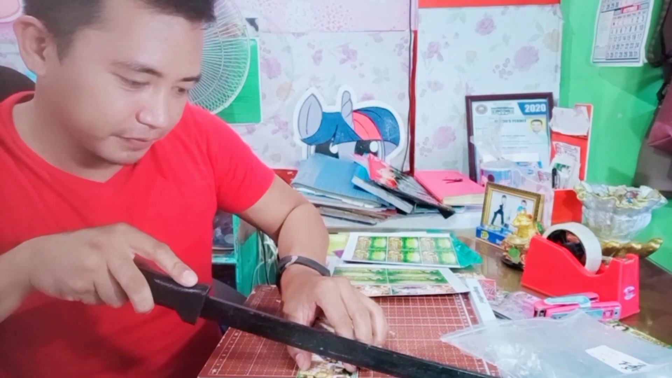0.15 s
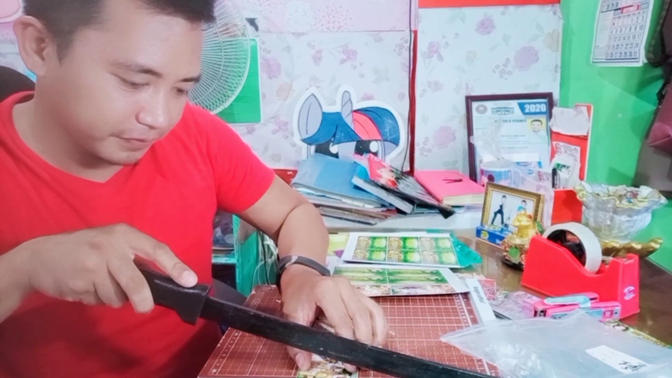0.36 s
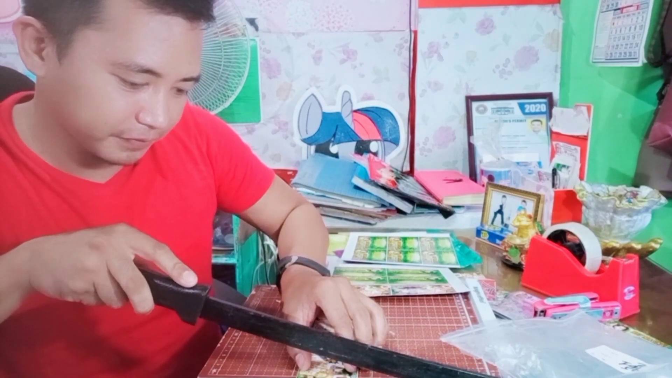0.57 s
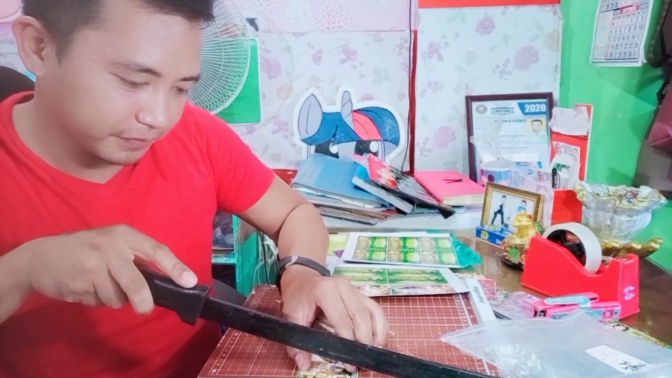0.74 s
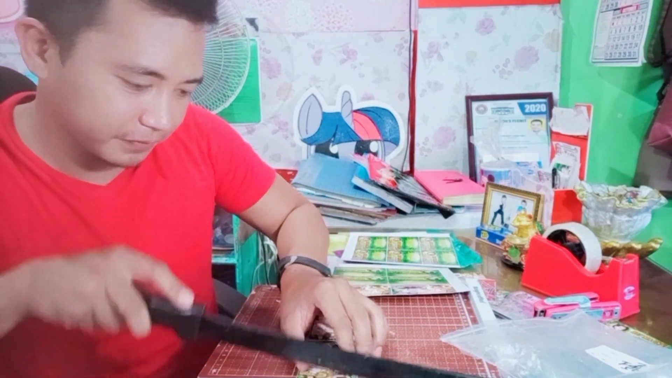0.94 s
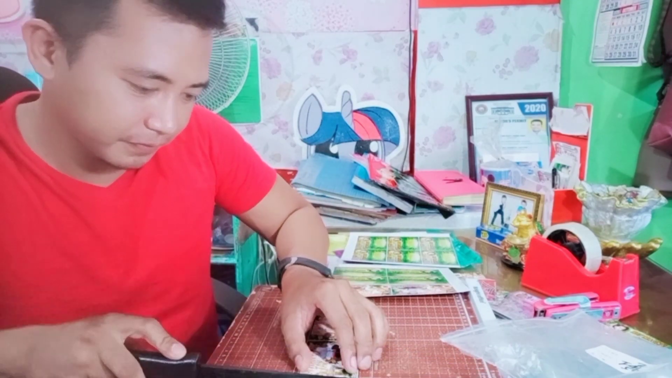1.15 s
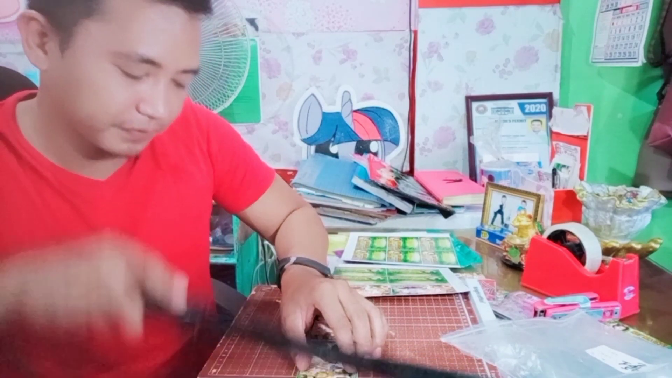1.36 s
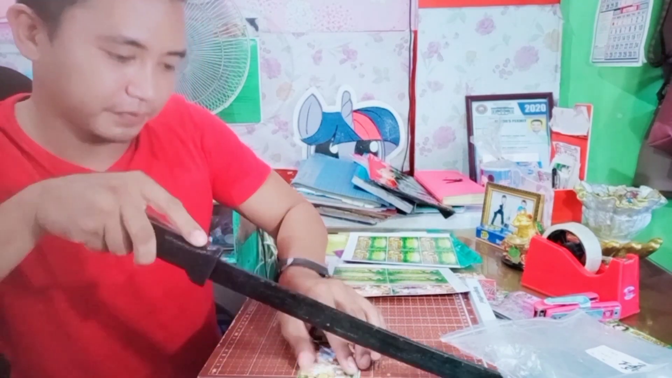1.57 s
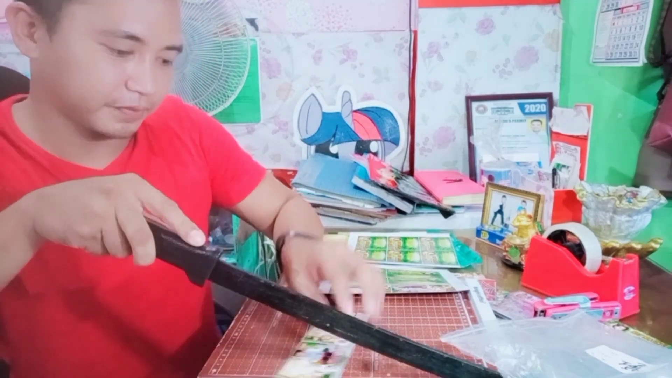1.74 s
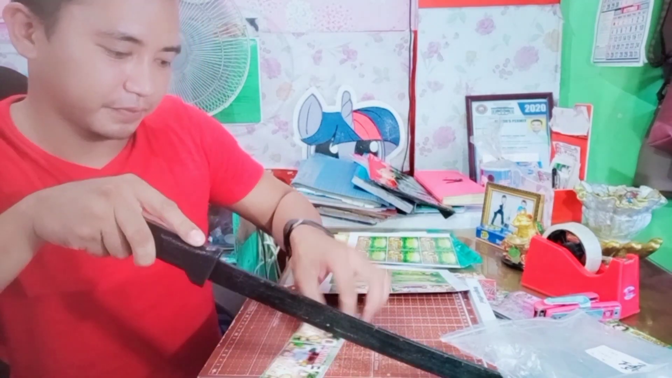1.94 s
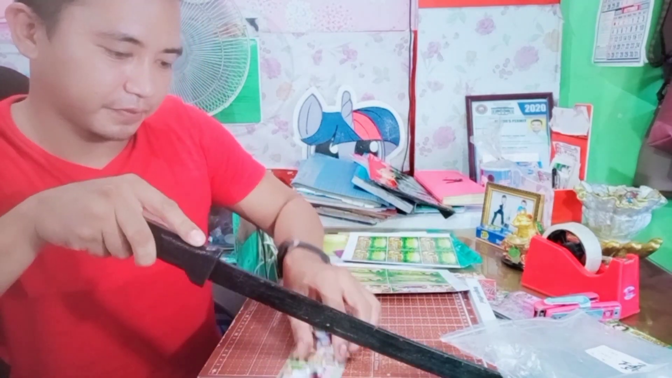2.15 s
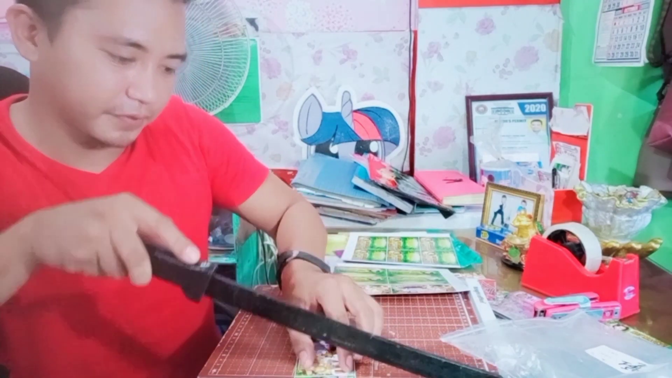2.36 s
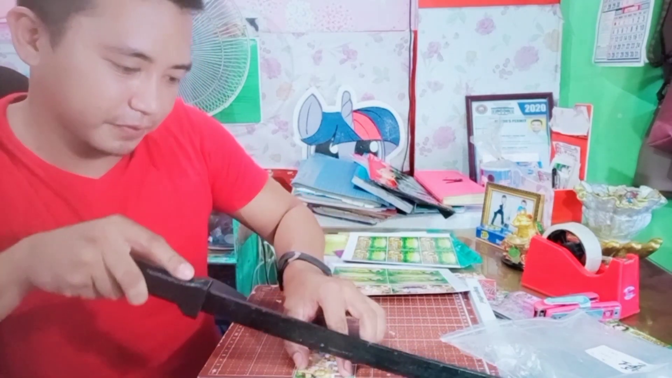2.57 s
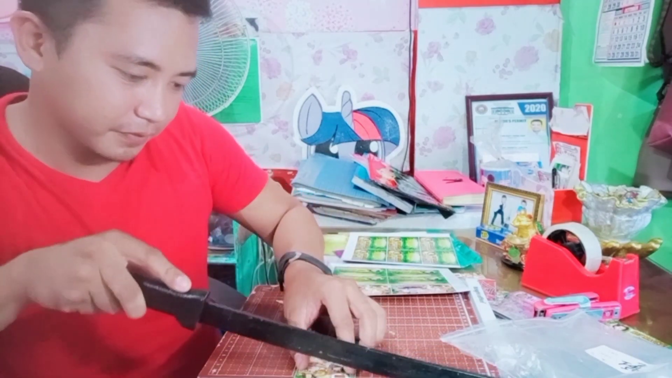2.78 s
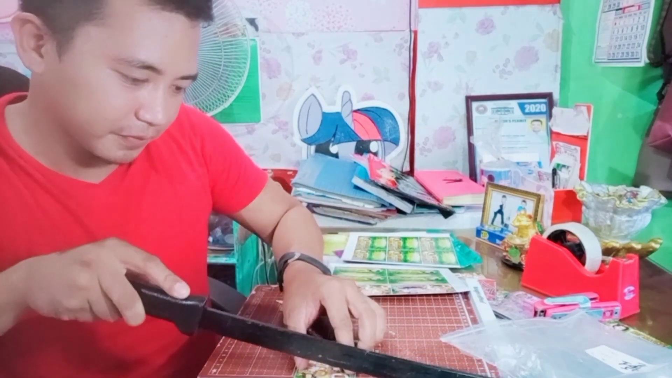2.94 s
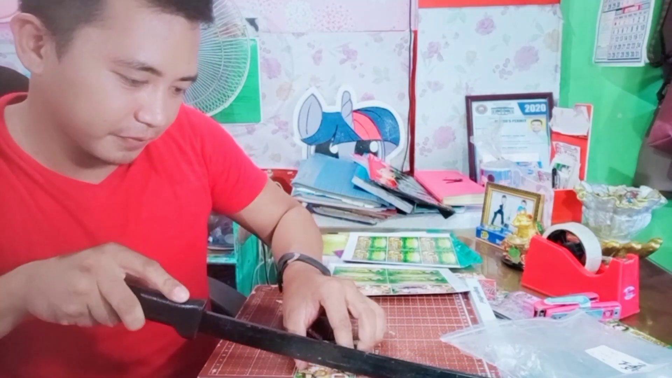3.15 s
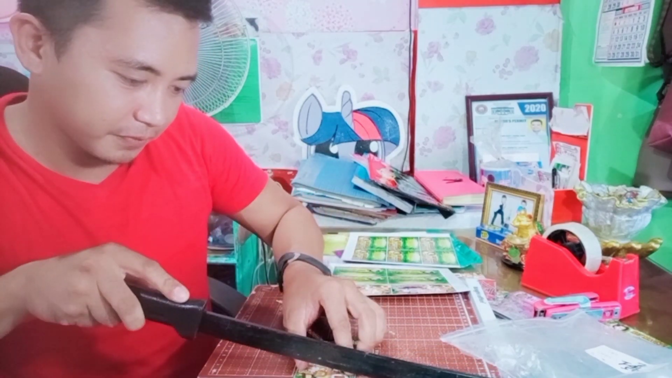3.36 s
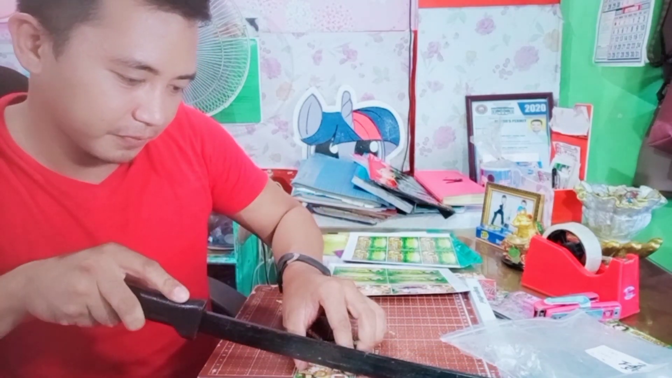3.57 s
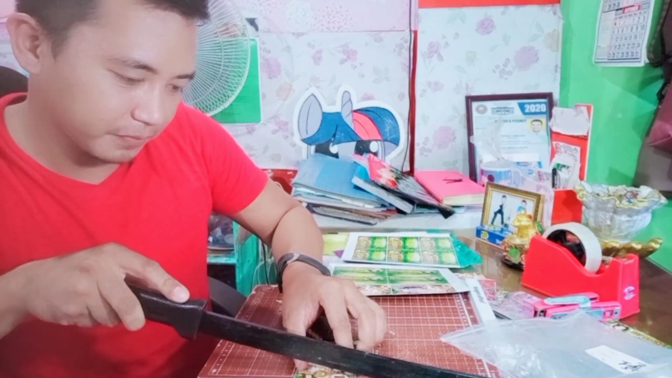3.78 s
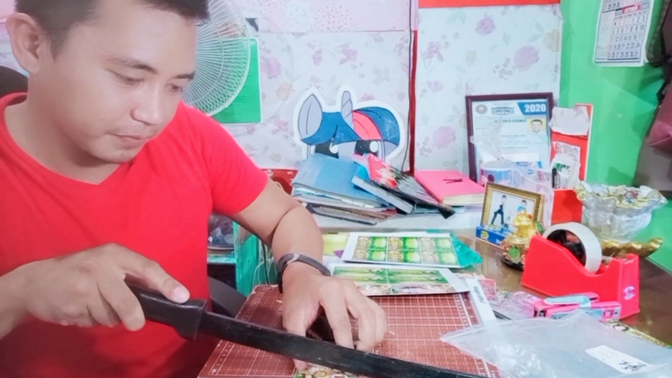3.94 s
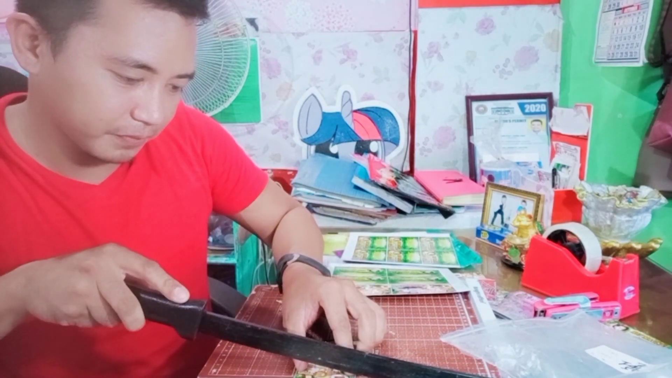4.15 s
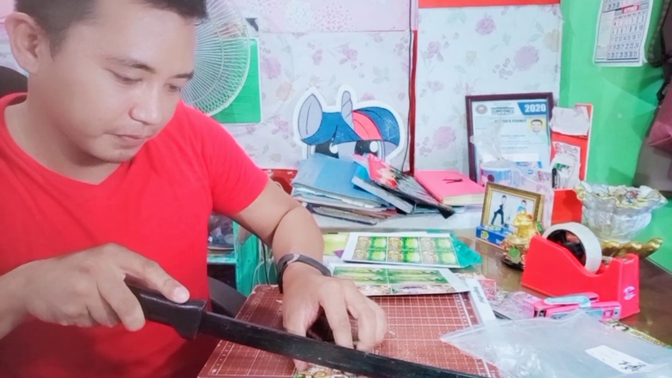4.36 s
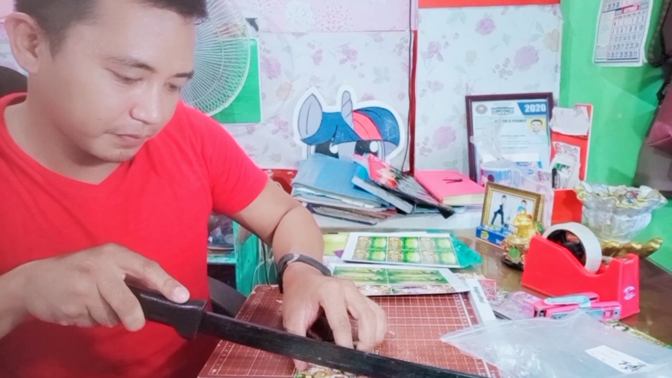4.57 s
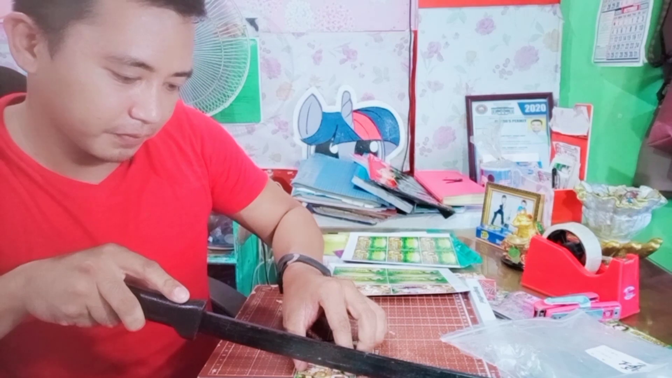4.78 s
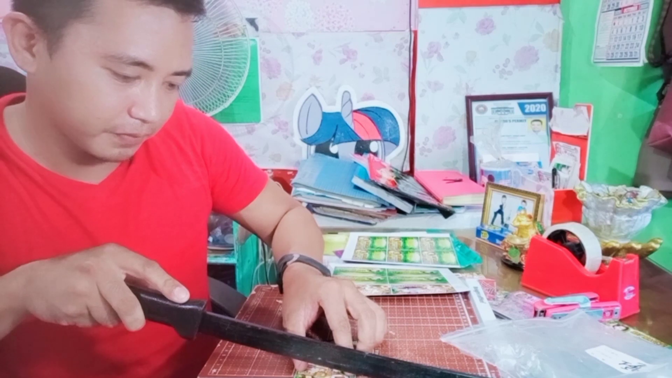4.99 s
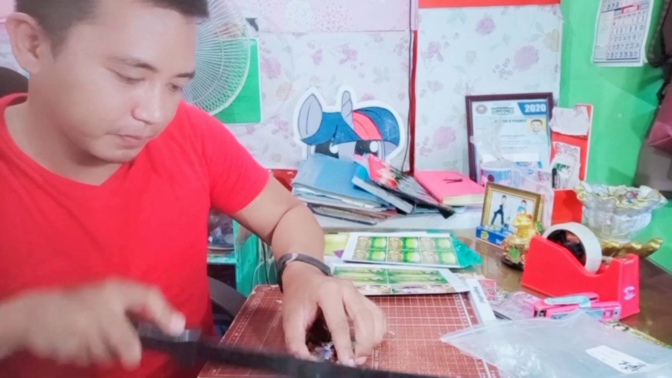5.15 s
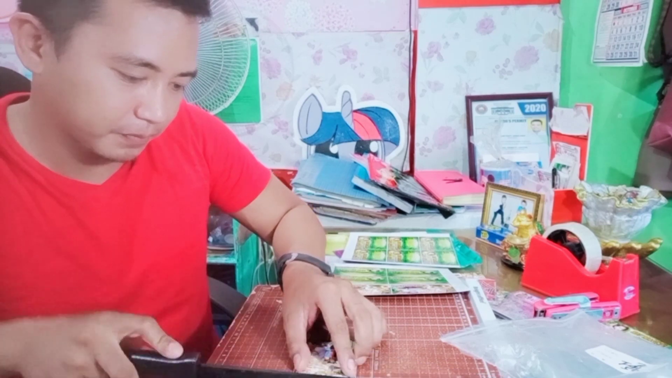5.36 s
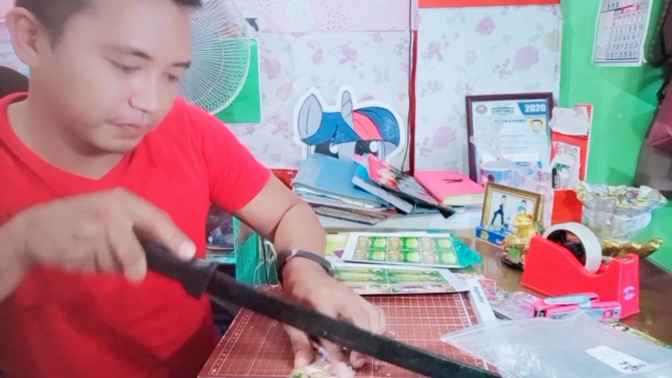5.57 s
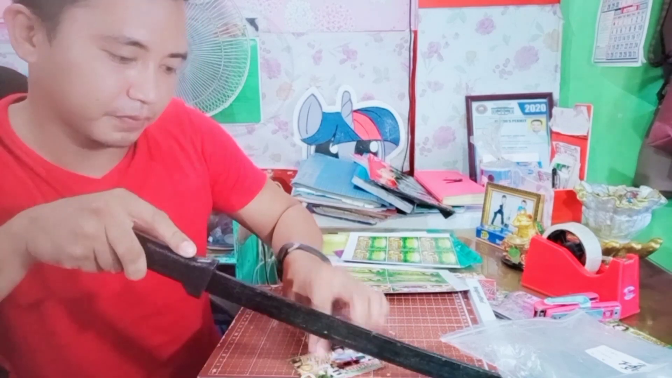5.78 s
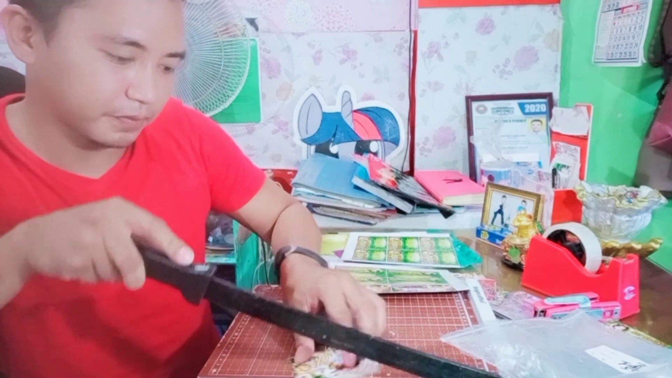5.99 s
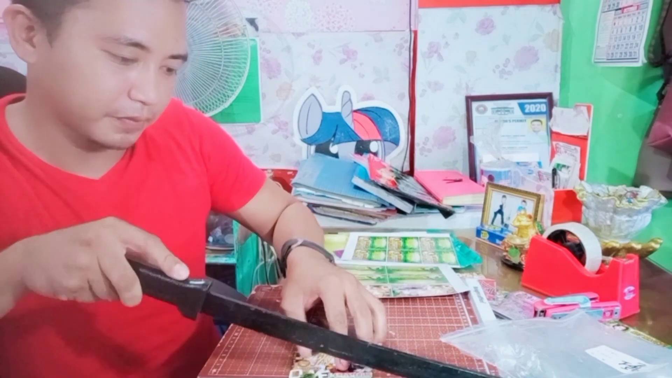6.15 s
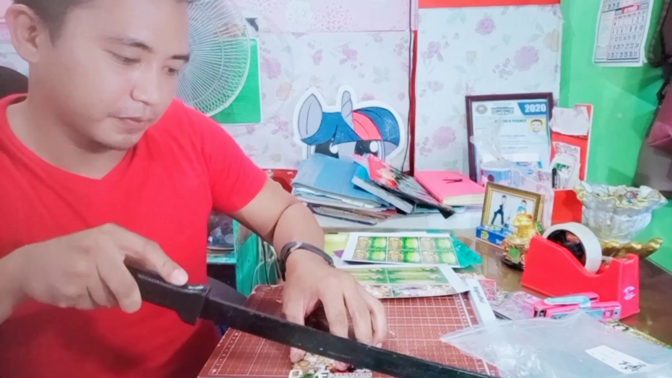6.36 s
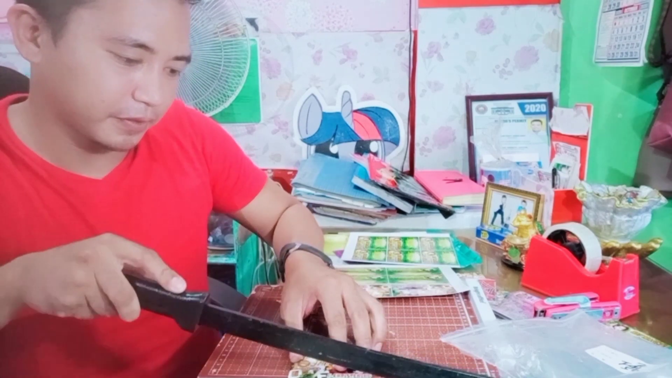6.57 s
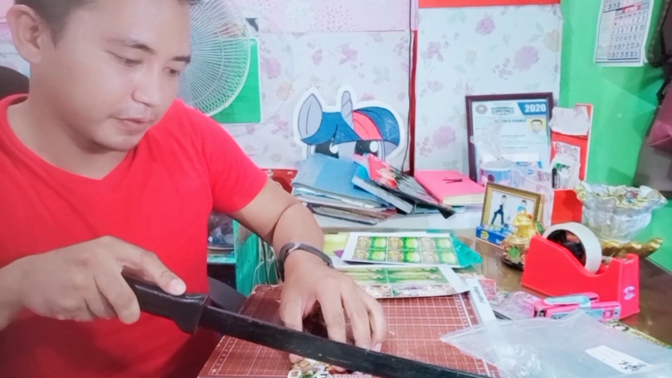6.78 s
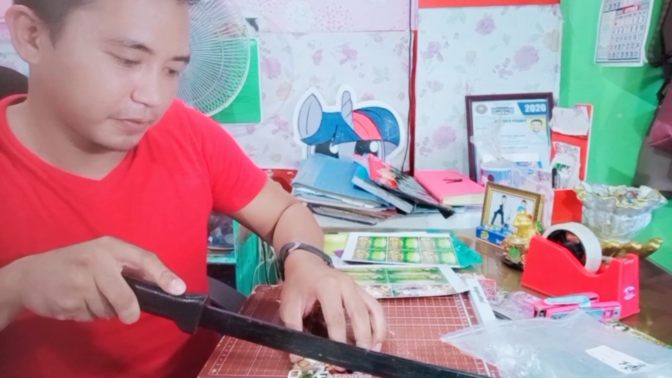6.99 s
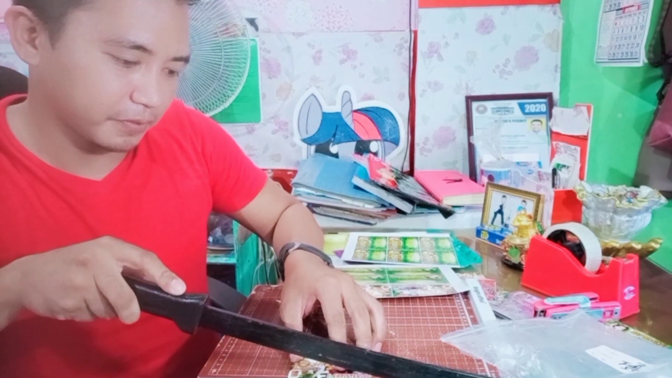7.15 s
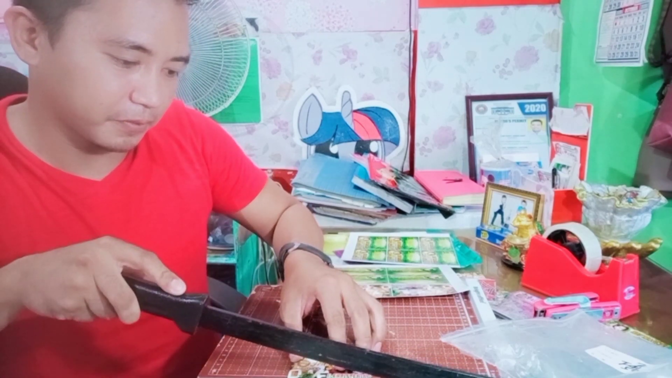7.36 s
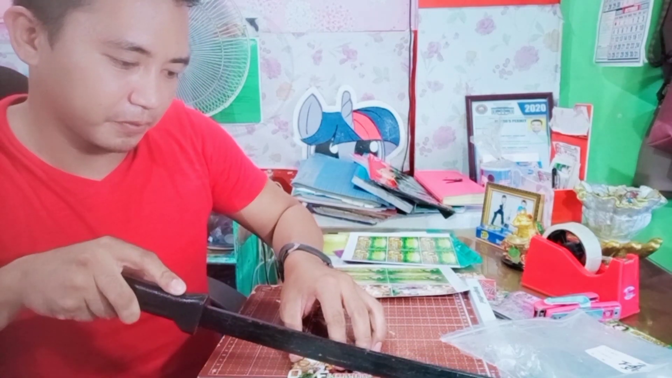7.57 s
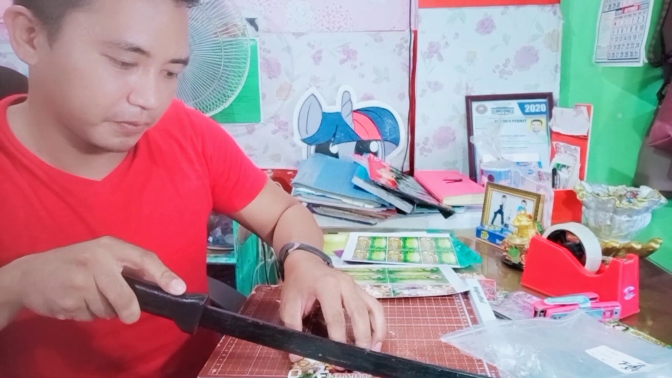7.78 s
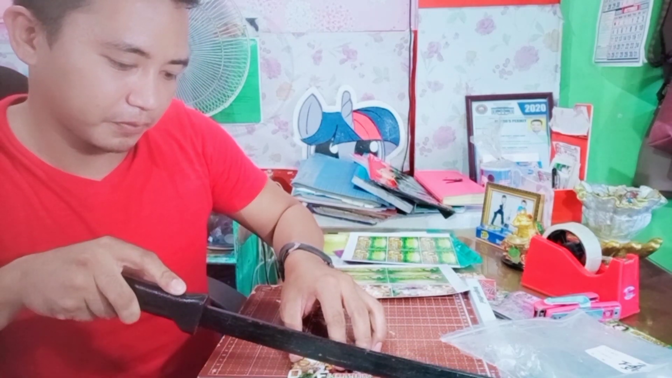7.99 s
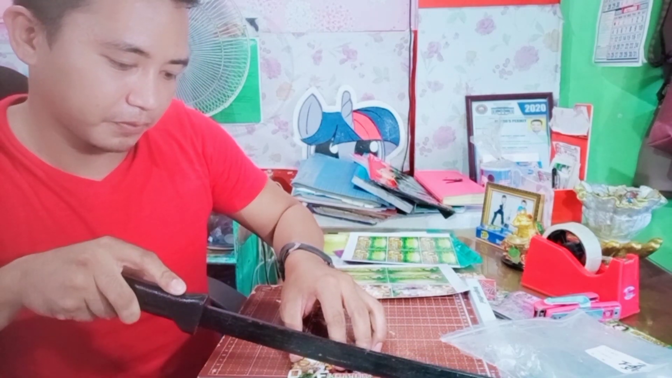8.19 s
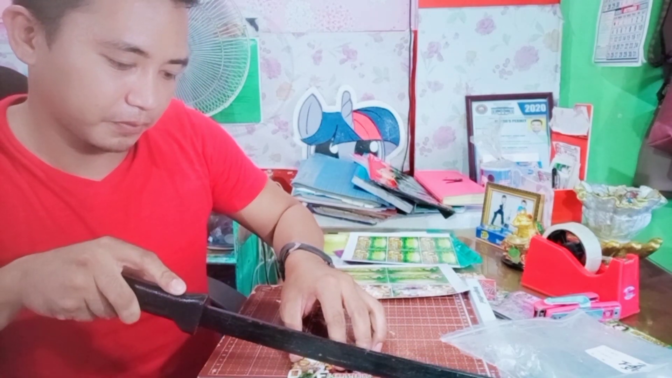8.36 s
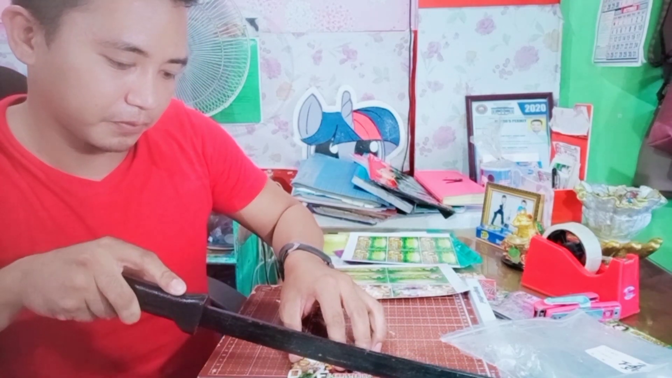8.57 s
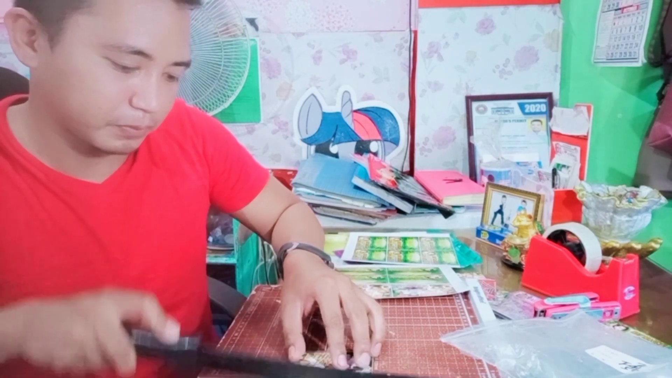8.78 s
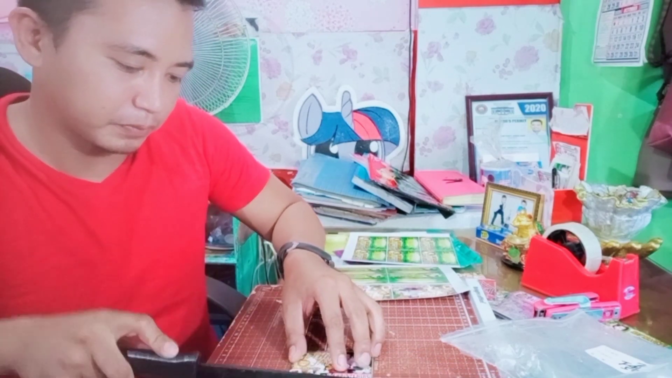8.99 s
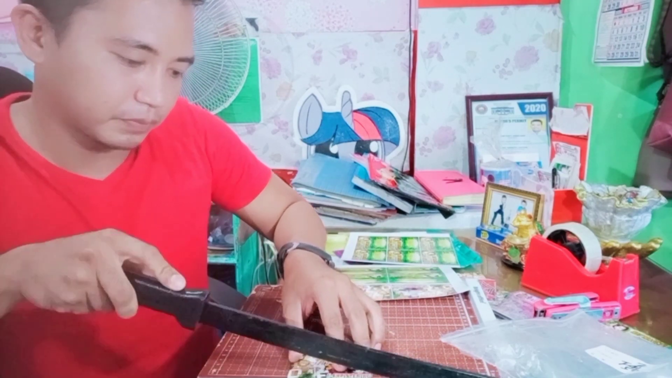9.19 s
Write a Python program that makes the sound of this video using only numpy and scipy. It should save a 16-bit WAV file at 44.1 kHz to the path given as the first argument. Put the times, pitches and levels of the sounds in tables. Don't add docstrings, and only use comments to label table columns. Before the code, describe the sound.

Steel cutter blade slices and thuds on its board in a small room, over a low engine drone that grows loud midway, then recedes.

```python
import sys
import numpy as np
from scipy import signal
from scipy.fft import rfft, irfft, next_fast_len
from scipy.io import wavfile
from scipy.ndimage import uniform_filter1d

SR = 44100
rng = np.random.default_rng(int(sys.argv[2]) if len(sys.argv) > 2 else 0)


def to_wav(s):
    ch = np.atleast_2d(s).T
    pcm = np.round(np.clip(ch, -1, 1) * 32767)
    wavfile.write(sys.argv[1], SR, pcm.astype(np.int16))


N = 407043
STREET_LAG = 19


def undb(db):
    return 10 ** (np.asarray(db) / 20)


def unit(x):
    return x / np.sqrt(np.mean(x ** 2))


def peak_unit(y):
    return y / np.abs(y.mean(axis=0)).max()


def columns(rows, step=1):
    s, *cols = np.transpose(rows)
    t = np.arange(0, N, step) / SR
    return np.array([np.interp(t, s, c) for c in cols])


def on_log(hz, points):
    f, v = np.transpose(points)
    return np.interp(np.log(hz + 1), np.log(f), v)


def walk(rate, count=1, step=1):
    held = np.repeat(rng.standard_normal((count, int(N / SR * rate) + 2)), 16, axis=1)
    slewed = 1.3 * uniform_filter1d(uniform_filter1d(held, 16), 16)
    place = np.arange(0, N, step) / SR * rate * 16
    return np.array([np.interp(place, np.arange(len(w)), w) for w in slewed])


def add(out, s, y):
    i = int(s * SR)
    out[:, i:i + y.shape[1]] += y[:, :N - i]


def shape(x, points, tilt_db=0):
    hz = np.arange(x.shape[1] // 2 + 1) * SR / x.shape[1]
    colour_db = on_log(hz, points) + tilt_db * np.log2(hz / 2000 + .1)
    return irfft(rfft(x) * undb(colour_db), x.shape[1])


# frequency in Hz, share common to both [0-1].
LIKENESS = [(60, 0.8), (330, 0.96), (600, 0.94), (900, 0.21), (2500, 0.55), (4000, 0.021), (15000, 0.04)]


def hiss(colour, split_hz, lag, grain=1.):
    size = next_fast_len(N)
    hz = np.arange(size // 2 + 1) * SR / size
    own = rfft(grain * rng.standard_normal((3, N)), size)
    like = np.clip(on_log(hz, LIKENESS), 0, 1)
    late = np.array([np.exp(-2j * np.pi * hz * lag / SR), np.ones_like(hz)])
    pair = np.sqrt(like) * own[2] * late + np.sqrt(1 - like) * own[:2]
    pair = pair * undb(on_log(hz, colour))
    below = [0 * hz] + [1 / (1 + (hz / f) ** 12) for f in split_hz] + [0 * hz + 1]
    bands = [np.sqrt(np.clip(b - a, 0, 1)) for a, b in zip(below, below[1:])]
    return [unit(irfft(pair * band, size)[:, :N]) for band in bands]


def swells(rows):
    t = np.arange(0, N, 64) / SR
    s, length, *gains = np.transpose(rows)[:, :, None]
    bell = np.exp(-(2 * (t - s) / length) ** 2)
    return np.array([np.interp(np.arange(N) / SR, t, (g * bell).sum(axis=0)) for g in gains])


# time in seconds, level in dB above its farthest.
NEARNESS = [(0, 3.5), (0.9, 2), (1.25, 5.5), (1.7, 1), (2.05, 0.5), (2.5, 1.5), (2.93, 5.5), (3.2, 1),
            (4.34, 6.5), (4.96, 11.5), (5.6, 19.5), (6.3, 23), (6.8, 18), (7.04, 12), (7.56, 15.5),
            (7.94, 12), (8.55, 12), (9.23, 12)]


def with_nearness(law):
    far_db, share = np.transpose(law)[:, :, None]
    return far_db + share * columns(NEARNESS)


# frequency in Hz, level in dB per Hz.
TRAFFIC_COLOUR = [(15, -52), (30, -30), (55, -16.5), (100, -5), (130, 2.5), (170, -7.5), (230, -19),
                  (400, -47)]
# level at rest in dB, dB gained per dB of nearness.
TRAFFIC_LAW = [(-40, 0.2)]
# centre in seconds, length in seconds, gain in dB.
LORRIES = [(0, 0.44, 0.5), (.7, 0.32, 1.5), (1.4, 0.35, 1.5), (5.42, 0.23, 2), (6.8, .6, 0.5),
           (7.8, 0.33, -1), (8.9, 2.5, 1)]


def traffic():
    db = (with_nearness(TRAFFIC_LAW) + swells(LORRIES))[0] - 1 + 2.1 * walk(10)
    return undb(db) * hiss(TRAFFIC_COLOUR, [], lag=9.0)[0]


# time in seconds, firing rate in Hz.
FIRING = [(0, 34.2), (1.2, 32.99), (1.8, 30.61), (2.9, 31.81), (3.5, 31.61), (4.1, 32.69), (5.3, 33.23),
          (6.1, 33.2), (7.0, 33.22), (9.23, 32.7)]


def firing_cycle():
    return np.cumsum(columns(FIRING)[0] * (1 + 0.004 * walk(12)[0])) / SR


ORDER_GROUP_TOPS = [2.5, 3.5, 5.5]
# frequency in Hz, level in dB.
ORDER_TILT = [(60, -3), (170, 3), (200, -7), (300, -7), (400, -12), (470, -14), (600, -10), (800, -22.5)]
# time in seconds, favoured frequency in Hz.
PIPE_PEAK = [(0, 372), (3.5, 345.5), (5.4, 367), (5.8, 337), (9.23, 343)]
# centre in seconds, length in seconds, frequency in Hz, gain in dB.
ORDER_SWELLS = [(6.05, 0.24, 333, 8), (6.27, 0.51, 333, 4), (5.75, .3, 433, 12.5), (6.35, 0.26, 466, 20),
                (7.4, .3, 366, 3), (6.85, 0.49, 300, 14.5), (4.9, .3, 333, -5), (5.1, 0.36, 200, 7),
                (7.38, 0.52, 331, 6.5), (5, 0.57, 600, 1), (6.0, 0.26, 533, 10.5), (5.76, 0.91, 133, 6.5),
                (5.6, 0.61, 166, -0.5), (7.05, 1, 165, 10), (6.77, 0.46, 566, 8), (3.76, 1, 357, 1),
                (4.62, 0.98, 363, 5), (4.72, .9, 330, 13.5), (4.54, 1, 429, 13), (4.86, 0.91, 462, 11.5),
                (4.6, .8, 297, 5), (4.6, 0.97, 200, 5), (5.25, .5, 231, 10), (7.2, 0.73, 200, 7),
                (7.8, .5, 364, 5.5), (6.4, 0.38, 333, 2.5), (6.75, 0.59, 266, 6.5), (5.7, 0.67, 660, 9.5)]
# level when far in dB, dB gained per dB of nearness.
EXHAUST_LAW = [
    (-61.5, 0.8029),
    (-53, -0.21),
    (-49.5, 0.7616),
    (-46.5, 0.74),
]
# centre in seconds, length in seconds, gain in dB.
ECHO_SWELLS = [
    [(0.35, 0.54, 16), (1.4, 0.28, 12), (3.45, 0.49, 14), (6.1, 1.25, 4), (7.1, .6, 8), (8.6, .5, 3)],
    [(0.8, 1.1, 19.5), (1.8, 0.93, 11.5), (2.9, .25, 1), (4.3, .6, -3), (7.5, 1.58, 11), (8.75, 0.55, 9)],
    [(0.1, 0.65, 18), (.5, 0.22, 9), (1.08, 0.62, 7), (1.67, 0.2, 14.5), (2.06, 0.29, 11),
     (3.75, 0.48, 10.5), (7.0, 0.66, 1.5), (8.95, 0.27, 10.5)],
    [(.3, 0.58, -15), (1.41, 0.2, -7), (2.88, .2, -3), (3.6, 0.78, 2), (4.96, 0.18, 3), (7.0, .35, -3),
     (8.6, 0.3, -2.5)],
]


def exhaust(cycle):
    coarse = 8
    order = np.arange(2, 24)[:, None]
    hz = order * columns(FIRING, step=coarse)
    pipe = np.exp(-((hz - columns(PIPE_PEAK, step=coarse)) / 20) ** 2)
    db = on_log(33 * order, ORDER_TILT) + 11 * pipe
    db = db + np.minimum(order / 2.5, 2.2) * walk(3, count=22, step=coarse)
    t = np.arange(0, N, coarse) / SR
    for s, length, swell_hz, gain_db in ORDER_SWELLS:
        nearest = np.argmin(np.abs(33 * order - swell_hz))
        db[nearest] += gain_db * np.exp(-(2 * (t - s) / length) ** 2)
    phase = .75 + .4 * (rng.random((22, 1)) - .5)
    tones = undb(db) * np.sin(2 * np.pi * (order * cycle[::coarse] + phase))
    group = np.searchsorted(ORDER_GROUP_TOPS, order[:, 0])
    levels = with_nearness(EXHAUST_LAW) + np.vstack([swells(rows) for rows in ECHO_SWELLS])
    gains = undb(levels[:, ::coarse] - 2.0)
    drone = sum(gain * unit(tones[group == k].sum(axis=0)) for k, gain in enumerate(gains))
    drone = signal.resample_poly(drone, coarse, 1)[:N]
    return np.array([np.roll(drone, 8), drone])


# extra path in seconds, wander as a share, gain as a factor.
MIRRORS = [(.00037, .03, .6), (.0016, .05, .95), (.0029, .04, .85)]


def mirrored(x):
    for late_s, wander, gain in MIRRORS:
        late = np.round(late_s * SR * (1 + wander * walk(3.5)[0])).astype(int)
        x = x + gain * x[:, np.arange(N) - late]
    return unit(x)


# frequency in Hz, level in dB per Hz.
STREET_COLOUR = [(120, -38), (200, -1), (345, 2), (420, -3), (700, -11), (1100, -14.5), (1500, -22),
                 (2350, -18.5), (2900, -21), (3500, -28.5), (4500, -24), (5250, -19.5), (6800, -33.5),
                 (16000, -26.5)]
STREET_SPLIT_HZ = [700, 3200, 7000]
# level when far in dB, dB gained per dB of nearness.
STREET_LAW = [
    (-46, 0.5241),
    (-47.5, 0.5274),
    (-65.5, 0.9676),
    (-69.5, 1.11),
]


def street(cycle):
    puff = 1 + 0.023 * np.cos(2 * np.pi * cycle)
    bands = hiss(STREET_COLOUR, STREET_SPLIT_HZ, STREET_LAG)
    bands[-1] = mirrored(bands[-1])
    return sum(undb(db + 0.87 * walk(8)) * b for db, b in zip(with_nearness(STREET_LAW), bands)) * puff


# time in seconds, frequency in Hz, level in dB.
GEAR_WHINE = [(0, 1040, -33), (.3, 1030, -37), (.6, 1016, -39.5), (.9, 1013, -46), (1.15, 950, -64)]


def gear_whine():
    hz, db = columns(GEAR_WHINE)
    turns = np.cumsum(hz * (1 + .008 * walk(60)[0])) / SR
    port_db, port_turn = np.array([[0], [3.5]]), np.array([[0], [.3]])
    gain = undb(db - 11.5 + 1.4 * walk(24.5) + port_db)
    return gain * np.sin(2 * np.pi * (turns + port_turn))


# frequency in Hz, width in Hz, level in dB.
RATTLE_RINGS = [
    (2260.5, 66, -3.5),
    (4674, 60, -2),
]
# level when far in dB, dB gained per dB of nearness.
RATTLE_LAW = [
    (-54.5, 0.7784),
    (-71.5, .5),
]
# centre in seconds, length in seconds, low and high ring gain in dB.
RATTLE_BOUTS = [(0.9, 0.37, 6, -3), (1.475, 0.08, -8, 23), (1.668, 0.16, 4, -1), (2.311, 0.67, 9, 6),
                (2.652, 0.16, 7.5, 5), (2.923, 0.42, 12, 17.5), (2.418, 0.23, 3.5, 2), (3.12, .2, 4, 1),
                (3.647, 0.25, 6.5, 3), (4.102, 0.62, 5.5, 8), (4.7, 0.82, 7.5, 6), (5.8, .5, -2.5, -8),
                (6.3, .3, -1, -5), (6.65, 0.48, -9, -3), (6.896, 0.16, -5, -6), (7.447, .5, 3.5, 7),
                (8.87, .3, 0, 3), (9.23, .25, -8, 1)]


def rattle(cycle):
    kick = np.diff(np.floor(cycle), prepend=0) * undb(2.5 * rng.standard_normal(N))
    kick = np.array([np.roll(kick, STREET_LAG), kick])
    kick = kick + 0.12 * np.exp(-(cycle % 1) / 1.5) * rng.standard_normal((2, N))
    out = 0
    for db, (hz, width, ring_db) in zip(with_nearness(RATTLE_LAW) + swells(RATTLE_BOUTS), RATTLE_RINGS):
        tin = signal.iirpeak(hz, hz / width, SR)
        ringing = unit(signal.lfilter(*tin, signal.lfilter(*tin, kick)))
        out = out + undb(db + ring_db + 0.46 * walk(9)) * ringing
    return out


# frequency in Hz, width in Hz.
COWL_RINGS = [(2390, 140), (2620, 140), (5190, 380)]
# level when far in dB, dB gained per dB of nearness.
COWL_LAW = [(-71.5, 0.89), (-70.5, 0.99), (-77.5, 1.1652)]
# centre in seconds, length in seconds, gain of the three rings in dB.
COWL_BOUTS = [(2.92, .35, 17, 0, -4), (4.7, .6, -3, 2, 2), (5.75, .35, 2, -7, 4), (6.03, 0.27, 7, 5, 6.5),
              (6.33, 0.39, 11, 0, 7), (6.68, 0.38, -4, 9.5, 0), (7.25, 0.54, -3, 8, 3),
              (8.1, .8, -2, 0, -1)]


def cowl():
    air = rng.standard_normal((3, N))
    air = air[:2] + 0.8 * np.array([np.roll(air[2], STREET_LAG), air[2]])
    out = 0
    for db, (hz, width) in zip(with_nearness(COWL_LAW) + swells(COWL_BOUTS), COWL_RINGS):
        cover = signal.iirpeak(hz, hz / width, SR)
        ringing = unit(signal.lfilter(*cover, signal.lfilter(*cover, air)))
        out = out + undb(db + 2.0 * walk(11)) * ringing
    return out


def motorcycle():
    cycle = firing_cycle()
    return exhaust(cycle) + street(cycle) + rattle(cycle) + gear_whine() + cowl()


# frequency in Hz, level in dB per Hz.
SNAP_COLOUR = [(300, -3), (1000, 1), (2100, 0.5), (3600, -6), (5600, -7.5), (7000, -15.5), (9500, -30),
               (14000, -22)]


def burst(tilt_db, t60, like):
    t = np.arange(SR // 4) / SR
    white = rng.standard_normal((3, len(t)))
    y = shape(like * white[2] + white[:2], SNAP_COLOUR, tilt_db)
    return peak_unit(y * undb(-60 * t / max(t60, .01)))


# start in seconds, peak in dB, brightness in dB per octave, t60 in seconds.
TICKS = [(0.8765, -24.5, -0.5, 0.07), (0.944, -33, -2, 0.048), (0.973, -31, -7, 0.054),
         (1.072, -18, 11, .04), (1.0995, -38, 1.1, 0.023), (1.122, -38, 5, .03), (1.305, -29, 0, .04),
         (1.51, -45, -3, .03), (3.036, -29, -3.5, 0.064), (3.89, -34, 10, 0.061), (5.0114, -28, 9, .03),
         (5.107, -27, -1.5, 0.041), (5.5757, -33, 11, .03), (8.566, -33, 11, .03), (8.6951, -38, -1, .03),
         (8.7473, -31, -2, .04)]


def ticks():
    out = np.zeros((2, N))
    for s, db, tilt_db, t60 in TICKS:
        add(out, s, undb(db) * burst(tilt_db, t60, like=0.13))
    return out


# frequency in Hz, width in Hz, level in dB.
SHEAR_RINGS = [(1480, 41, -5.5), (1852, 91, 6.5), (2100, 45, -1), (2226, 51, -4), (2590, 42, -11),
               (3510, 43, -7), (5160, 73, -25)]
# start, rise and fall in seconds, peak in dB, tilt in dB per octave.
SHEARS = [(0.877, .004, 0.035, -40.5, 0), (0.944, .004, .03, -45, -4), (0.974, .008, .06, -39.5, -7),
          (1.045, 0.026, 0.024, -38, -5), (1.1, .01, 0.05, -42, 3), (5.108, .004, 0.026, -38, -1),
          (5.15, .02, .03, -34, 2), (5.175, 0.021, 0.027, -33, -1), (8.695, .004, .03, -45, -1),
          (8.747, .008, 0.035, -34, -3), (8.775, .02, .04, -39, -1)]
# frequency in Hz, width in Hz, level in dB.
LIFT_RINGS = [(1088, 110, -0.5), (1490, 96, -13.5), (1750, 48, -6), (2380, 54, -1), (2880, 32, -9),
              (3180, 31, -10), (5340, 58, -13.5)]
# start, rise and fall in seconds, peak in dB, tilt in dB per octave.
LIFTS = [(1.303, 0.017, .03, -32.5, -2.2), (1.32, 0.021, .012, -35, 2), (1.44, 0.021, .015, -36, 1),
         (1.48, .006, 0.027, -38.5, 1.2), (5.423, .012, .03, -29, 1.2), (5.445, 0.013, .025, -37, -2),
         (5.525, 0.017, .015, -38, 1), (9.028, 0.029, .03, -37, 1)]


def blade(strokes, rings):
    out = np.zeros((2, N))
    t = np.arange(SR // 8) / SR
    for s, rise, fall, db, tilt_db in strokes:
        knots = np.cumsum([0, .002, rise, fall, .01])
        press = undb(np.interp(t, knots, [-60, -9, 0, -10, -90]))
        white = rng.standard_normal((3, len(t)))
        rub = press * (0.63 * white[2] + white[:2])
        y = 0
        for hz, width, ring_db in rings:
            width = np.clip(0.56 * width, 40, 400)
            gain = undb(ring_db + tilt_db * np.log2(hz / 2000)) / np.sqrt(width)
            y = y + gain * signal.lfilter(*signal.iirpeak(hz, hz / width, SR), rub)
        add(out, s, undb(db) * unit(y) * np.sqrt(np.mean(press ** 2)))
    return out


def ring(modes, spread_hz, rise_s):
    hz, db, t60 = np.transpose(modes)[:, :, None]
    t = np.arange(SR // 4) / SR
    turn = 2 * np.pi * rng.random((3, len(modes), 1))
    phase = turn[2] + np.minimum(hz / spread_hz, 1) ** 2 * 0.59 * (turn[:2] - np.pi)
    y = (undb(db - 60 * t / t60) * np.sin(2 * np.pi * hz * t + phase)).sum(axis=1)
    return peak_unit(y * (1 - np.exp(-t / rise_s)))


def strike(body, push_s=.004):
    t = np.arange(SR // 20) / SR
    blow = .045 * rng.standard_normal((1, len(t))) * np.exp(-t / push_s)
    blow[0, 0] = 1
    return peak_unit(signal.fftconvolve(body, blow, axes=1))


def pressure(strokes, law):
    power = np.zeros((len(law), N))
    for s, rise, fall, db, bright_db in strokes:
        t = np.arange(int((rise + fall + .016) * SR)) / SR
        knots = np.cumsum([0, .004, rise, fall, .012])
        gains = []
        for offset_db, share, from_db, to_db in law:
            top = db + offset_db + share * bright_db
            gains.append(np.interp(t, knots, [-90, top + from_db, top, top + to_db, -90]))
        add(power, s - .004, undb(gains) ** 2)
    return np.sqrt(power)


# frequency in Hz, level in dB, t60 in seconds.
ARM = [(490, -5.5, 0.21), (560, -4.5, 0.2), (1040, 0, 0.08), (1230, -11, 0.055), (1483, -6, 0.11),
       (1900, -6.5, 0.15), (2560, -6, 0.1), (2630, -26, 0.036)]


def rubbing(gains, colour, grit_db, singing):
    grain = undb(grit_db * (walk(400) + 0.23 * walk(64)))
    body, *upper = hiss(colour, STREET_SPLIT_HZ[1:], 0.73, grain)
    if singing:
        arm = ring(ARM, spread_hz=2900, rise_s=0.0037)[:, :SR // 50]
        body = unit(body + singing * unit(signal.oaconvolve(body, arm, axes=1)[:, :N]))
    return sum(gain * b for gain, b in zip(gains, [body] + upper))


# start, rise and fall in seconds, peak in dB, brightness in dB.
STROKES = [(0.9, .004, 0.28, -47, -3), (1.03, 0.042, 0.1, -33, 2), (1.305, .003, .03, -36.5, -2),
           (1.305, 0.024, 0.079, -35.5, 3), (1.405, 0.0024, 0.019, -24.5, -4), (1.43, .004, 0.086, -38, 0),
           (5.01, 0.0097, .09, -57, 16), (5.1, 0.0093, 0.024, -41.5, 15), (5.148, 0.015, 0.027, -34, -4),
           (5.165, 0.057, 0.064, -33.5, -4.5), (5.418, 0.0062, .02, -38, 9),
           (5.435, 0.014, 0.074, -37.5, 3), (5.508, .004, 0.079, -32, 5), (8.68, 0.025, 0.049, -39, -16),
           (8.744, 0.0054, 0.077, -36, 3), (8.81, 0.021, 0.014, -33, -3), (9.02, 0.022, 0.046, -36, 6.5)]
# frequency in Hz, level in dB per Hz.
STROKE_COLOUR = [(180, -15), (300, -6), (378, -13), (527, -3), (699, -8.5), (1010, -10), (1600, -12.5),
                 (2510, -13.5), (3320, -26.5), (5470, -18.5), (6670, -38.5), (8410, -27), (9610, -35),
                 (14100, -26), (15800, -44)]
# dB to the peak level, share of brightness, rise from dB, fall to dB.
STROKE_LAW = [
    (.5, 0.018, -4.5, -5),
    (-9, 0.37, -21, -10),
    (-17, 1.25, -21, -22),
]


def blade_strokes():
    return rubbing(pressure(STROKES, STROKE_LAW), STROKE_COLOUR, grit_db=2.5, singing=0.86)


# start in seconds, peak in dB, brightness in dB per octave.
CLICKS = [(.9426, -30, -1.5), (0.9718, -30, -2), (1.0314, -38, 2), (1.058, -35, 1), (1.0712, -29, 10),
          (1.081, -29, 1), (1.091, -30, 0), (1.101, -36, 3), (1.122, -37, 4), (1.137, -31, 3),
          (1.2722, -44, 7), (1.2821, -36, 6), (1.3001, -33, 2), (1.3141, -31, -1), (1.341, -28, 1),
          (1.4587, -26, 0), (1.4817, -25, 0), (1.507, -39, 3), (5.0112, -35, 7), (5.1066, -26, 5),
          (5.196, -35, 0), (5.249, -25, 2), (5.452, -33, 4), (5.573, -24.5, 2), (8.696, -27, -3),
          (8.746, -23, 11), (8.978, -33, 3), (9.034, -26, 2), (9.073, -33, 5)]
# start in seconds, peak in dB, frequency in Hz, t60 in seconds.
PINGS = [(.943, -31, 1920, 0.033), (1.076, -29.5, 1850, .08), (5.1075, -30, 1780, 0.036),
         (8.748, -33, 1650, .05), (1.159, -23, 2516, .05), (1.411, -26, 1936, .07), (5.264, -23, 2600, .05),
         (5.45, -27, 1095, .1), (5.514, -24, 1930, 0.18), (8.8583, -23, 2590, .05),
         (9.046, -37, 2570, 0.088)]


def catches():
    out = np.zeros((2, N))
    for s, db, tilt_db in CLICKS:
        add(out, s, undb(db) * burst(tilt_db, t60=0.016, like=0.26))
    for s, db, hz, t60 in PINGS:
        steel = ring([(hz, 0, t60), (1.06 * hz, -5, 0.5 * t60)], spread_hz=3200, rise_s=0.0014)
        add(out, s, undb(db) * strike(steel, 0.008))
    return out


# start in seconds, peak in dB, steel level in dB, crack level in dB.
CHOPS = [
    (1.147, 3.5, -4.5, 1),
    (5.254, 1.5, -3, 5),
    (8.846, 3, -7, 4),
]
# frequency in Hz, level in dB, t60 in seconds.
BOARD = [(187, -11.5, 0.22), (254.2, 4.5, 0.098), (304, -4.5, 0.12), (420, 0.5, 0.087), (501, 3.5, 0.098),
         (606, -12, 0.15), (667, -8, 0.076), (737, -12.5, 0.069)]
# frequency in Hz, level in dB, t60 in seconds.
STEEL = [(903, -10.5, 0.12), (1016, 5, 0.076), (1148, -1.5, 0.061), (1245, 3.5, 0.056), (1490, -8, 0.019),
         (1975, 0.5, 0.083), (2020, -4.5, 0.086), (2250, -1.5, 0.11), (2634, -2, 0.099), (2880, 1.5, 0.056),
         (3750, -19, .03), (4930, -22, 0.047), (5150, -13.5, 0.13), (5950, -13, 0.03)]


def chops():
    out = np.zeros((2, N))
    board, steel = ring(BOARD, 1500, .004), ring(STEEL, 1200, .001)
    for s, db, steel_db, crack_db in CHOPS:
        crack = db + crack_db
        add(out, s + 0.00172, undb(db - 9.0) * strike(board, 0.0017))
        add(out, s, undb(db + steel_db - 8.0) * strike(steel))
        add(out, s, undb(crack - 17.5) * burst(-0.42, 0.039, 0.97))
        add(out, s, undb(crack - 18.5) * ring([(2550, 0, 0.0053)], 3300, 0.00021))
        add(out, s, undb(crack - 22.0) * burst(-3.2, 0.28, 0.075))
        add(out, s + 0.011, undb(crack - 24) * burst(0.3, 0.06, 0.45))
    return out


# start in seconds, peak in dB.
STOPS = [(1.402, -16), (1.441, -21.5), (1.484, -37), (5.423, -24.5), (5.51, -16.5), (9.049, -32)]


def stops():
    out = np.zeros((2, N))
    for s, db in STOPS:
        add(out, s, undb(db - 3.5) * strike(ring(ARM, 3224, 0.00053)))
        add(out, s, undb(db - 4) * burst(-0.36, 0.044, 0.37))
    return out


# start, rise and fall in seconds, peak in dB, brightness in dB.
SLIDE = [
    (2.008, 0.07, 0.083, -54, 11.5),
    (2.07, 0.085, 0.19, -47, 3.5),
    (2.43, 0.06, 0.056, -61, 9),
]
# frequency in Hz, level in dB per Hz.
SLIDE_COLOUR = [(590, -45), (1000, -17), (1110, -10), (1330, -13), (2220, -4), (3650, -23), (4700, -22),
                (5340, -14), (7120, -33.5), (13400, -24), (15800, -26)]
# dB to the peak level, share of brightness, rise from dB, fall to dB.
SLIDE_LAW = [
    (0, .02, -12, -20),
    (-2, .3, -6, -18),
    (-7.5, 1.1, -14, -13),
]


def sheet_slide():
    return rubbing(pressure(SLIDE, SLIDE_LAW), SLIDE_COLOUR, grit_db=0.89, singing=0)


def cutter():
    board_sounds = ticks() + blade_strokes() + chops() + stops() + sheet_slide()
    no_deep_bass = signal.butter(2, 70, "high", fs=SR, output="sos")
    singing = blade(SHEARS, SHEAR_RINGS) + blade(LIFTS, LIFT_RINGS)
    return signal.sosfilt(no_deep_bass, board_sounds) + singing + catches()


def scene():
    return traffic() + motorcycle() + cutter()


# frequency in Hz, level in dB.
TREBLE_RIPPLE = [(6500, 0), (8800, -5.5), (9300, -3.5), (9750, -8.5), (10600, -6.5), (11500, -5.5), (12300, -9),
                 (13600, -5.5), (14600, -12), (15400, -6), (15800, -23), (16100, -70)]


def microphones(dry):
    size = next_fast_len(N + N % 2, True)
    heard = shape(np.pad(dry, ((0, 0), (0, size - N))), TREBLE_RIPPLE)[:, :N]
    port = signal.lfilter(*signal.iirpeak(5300, 4.5, SR), heard)
    tilt = np.array([[-1], [1]])
    return (heard + 0.16 * tilt * port) * undb(0.37 * tilt)


def band_limit(x):
    return signal.sosfilt(signal.butter(12, 16370, fs=SR, output="sos"), x)


def record(dry):
    mix = 0.88 * np.tanh(microphones(dry) / 0.93)
    return band_limit(mix)


dry = scene()
out = record(dry)
to_wav(out)
```